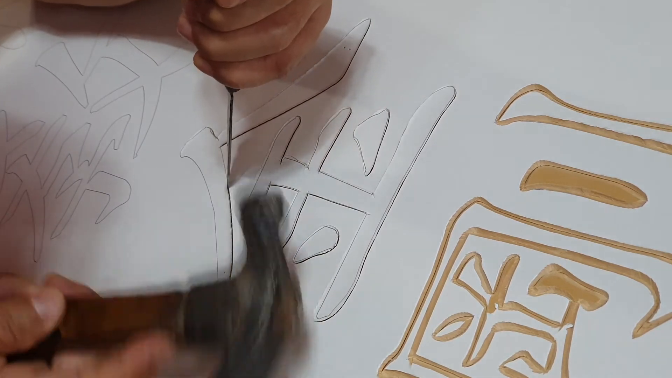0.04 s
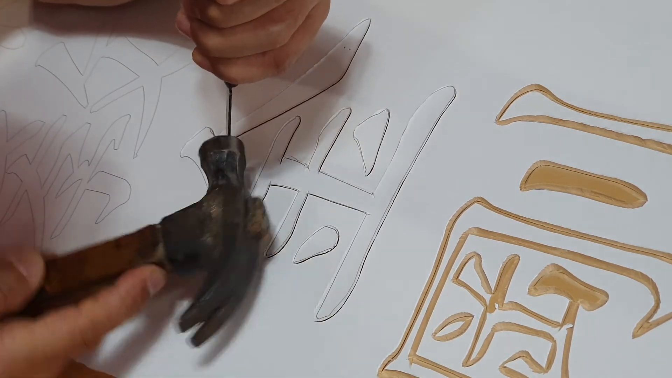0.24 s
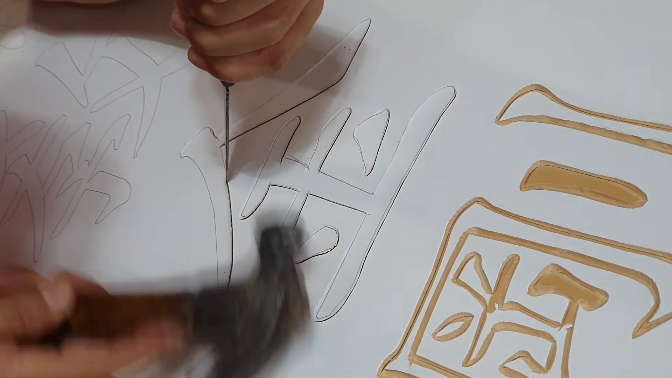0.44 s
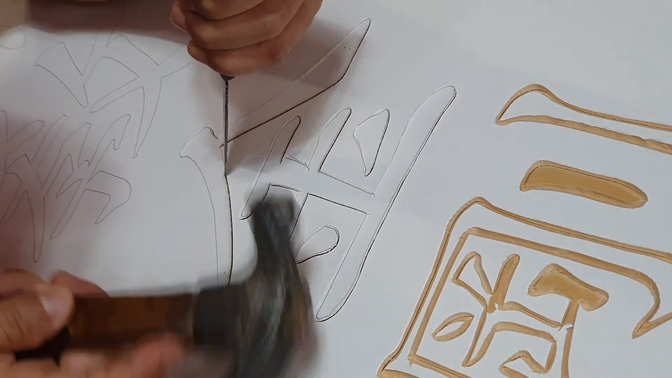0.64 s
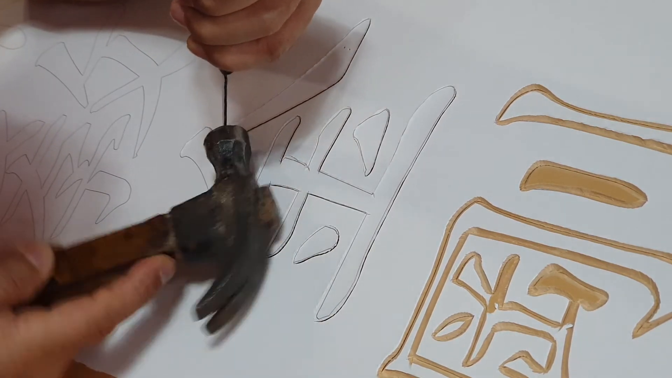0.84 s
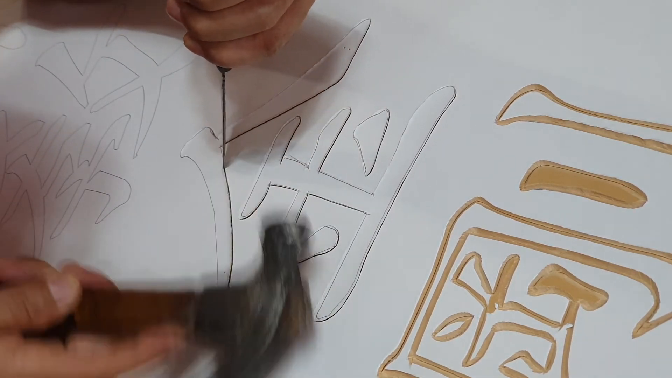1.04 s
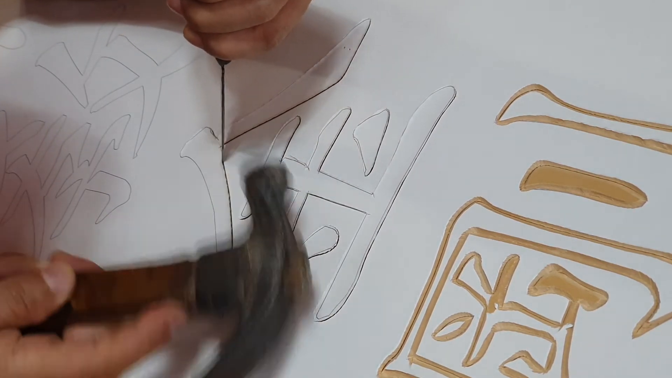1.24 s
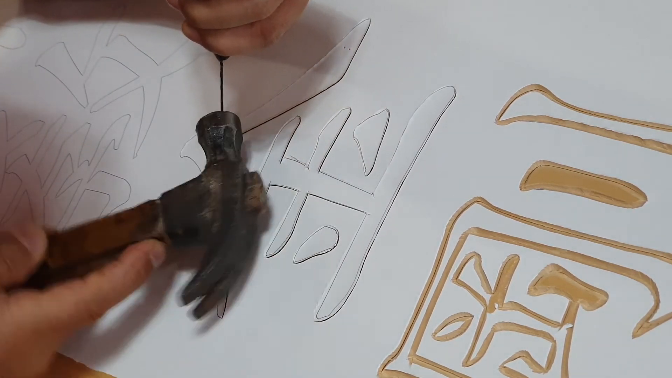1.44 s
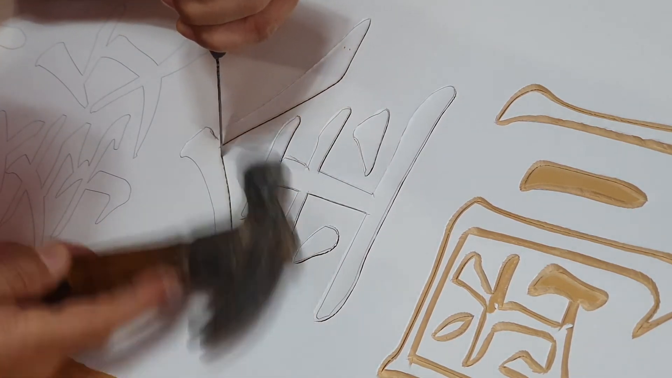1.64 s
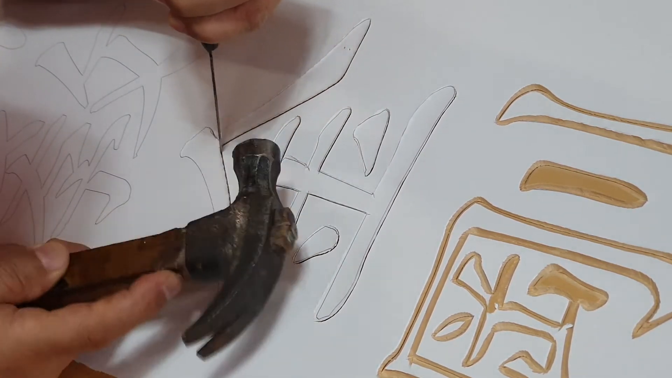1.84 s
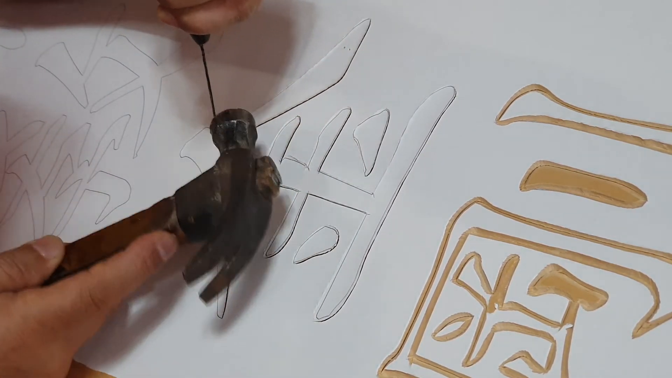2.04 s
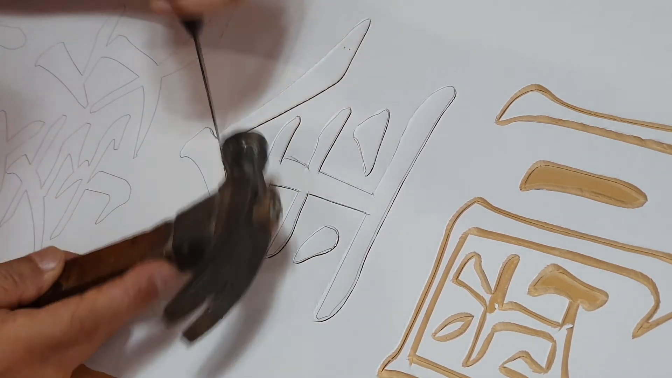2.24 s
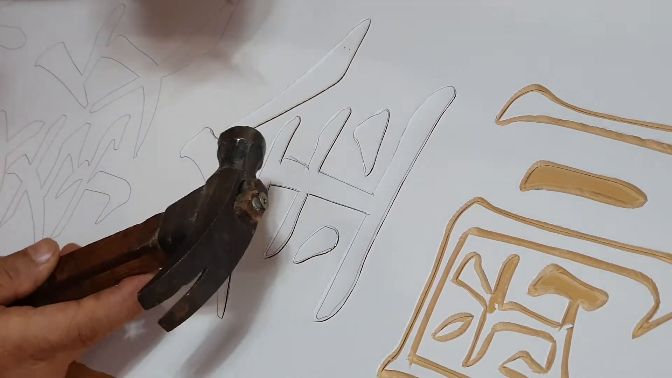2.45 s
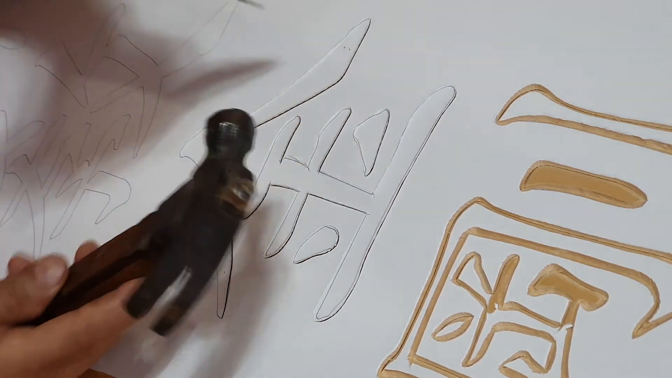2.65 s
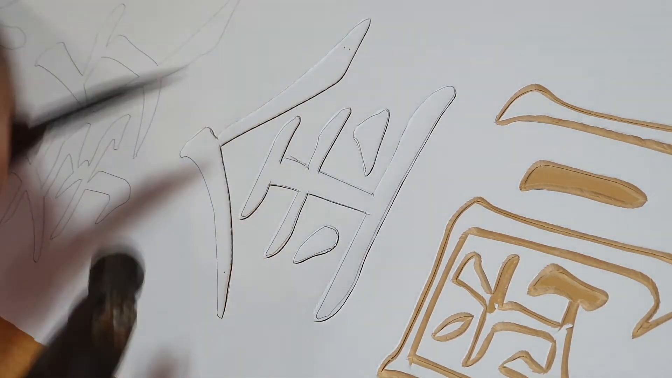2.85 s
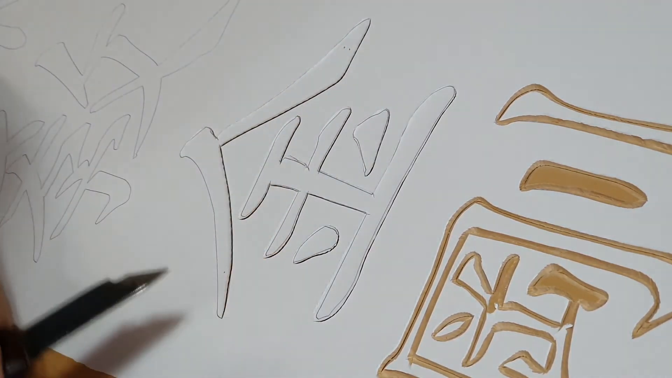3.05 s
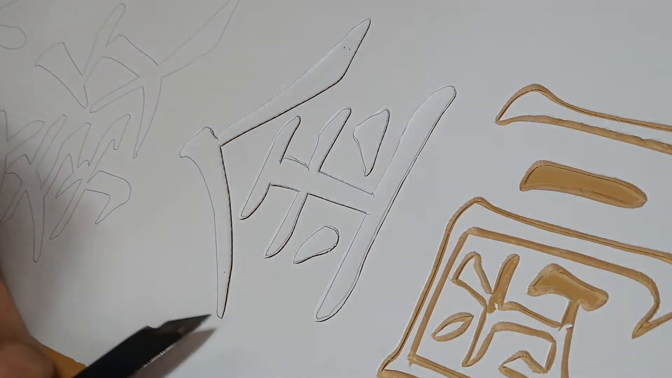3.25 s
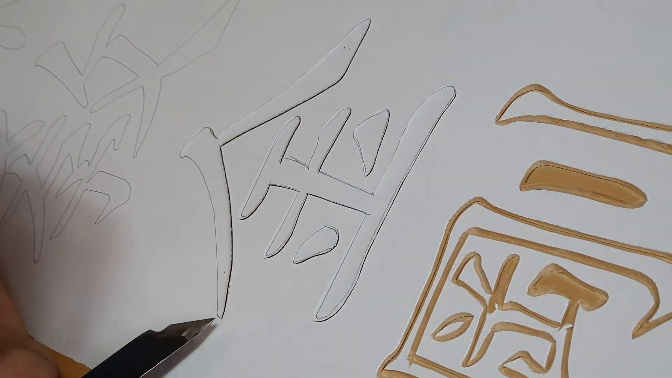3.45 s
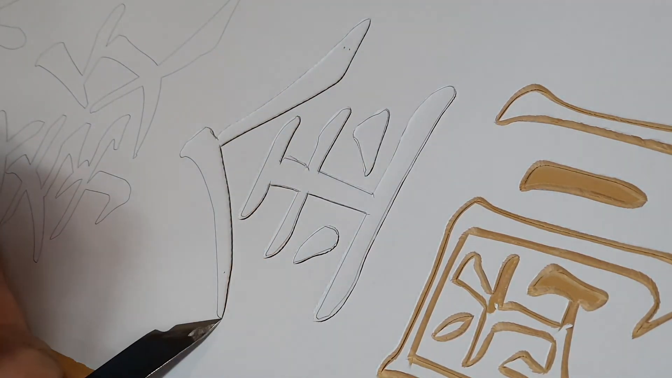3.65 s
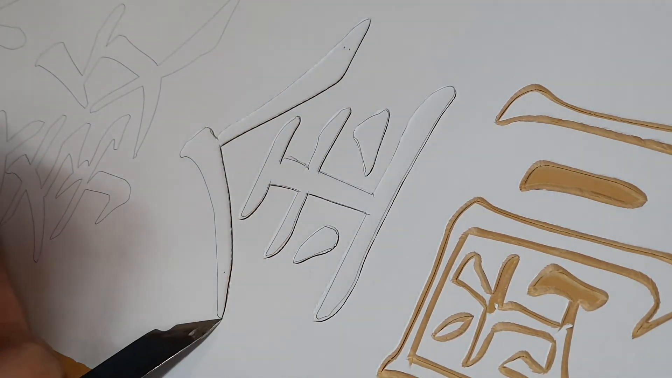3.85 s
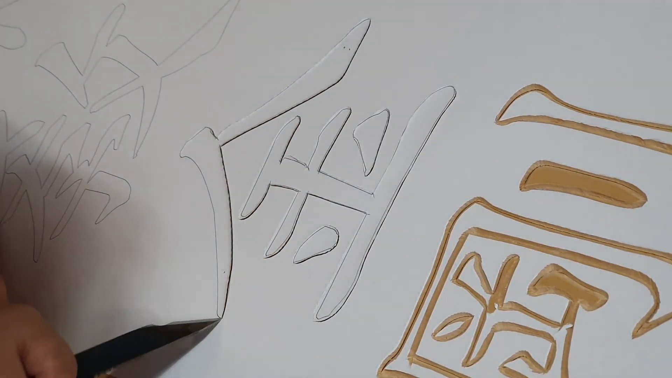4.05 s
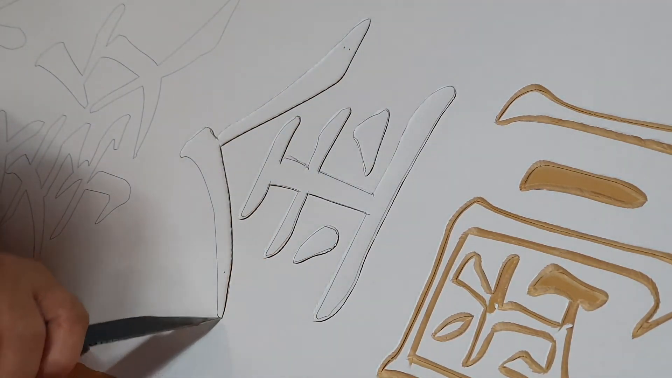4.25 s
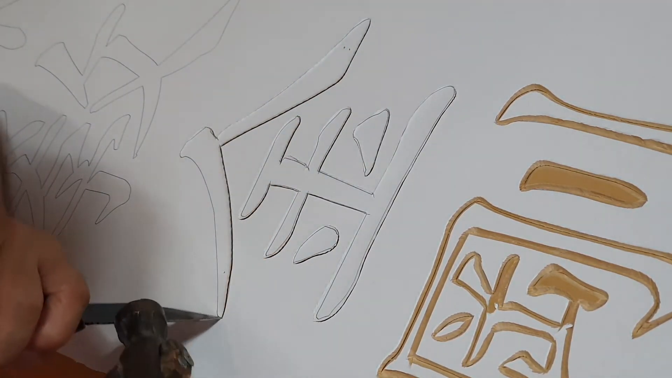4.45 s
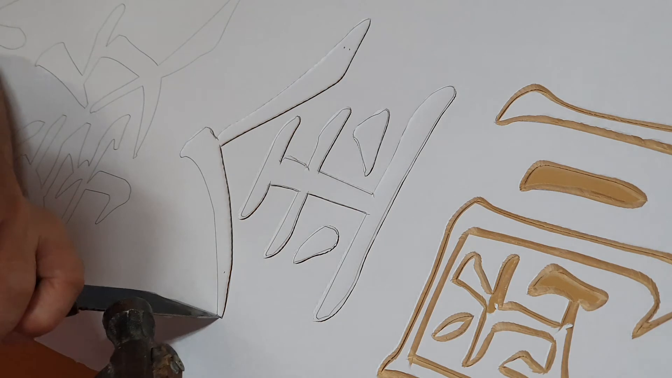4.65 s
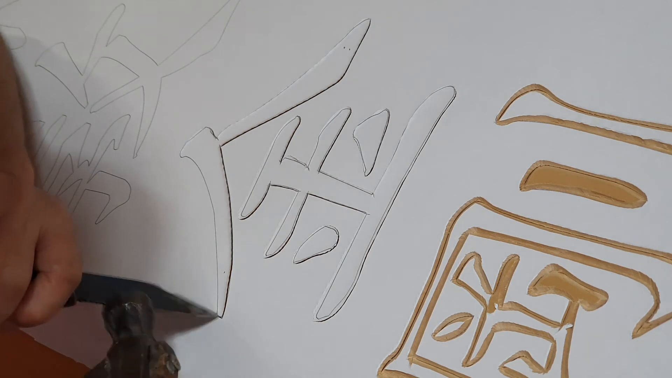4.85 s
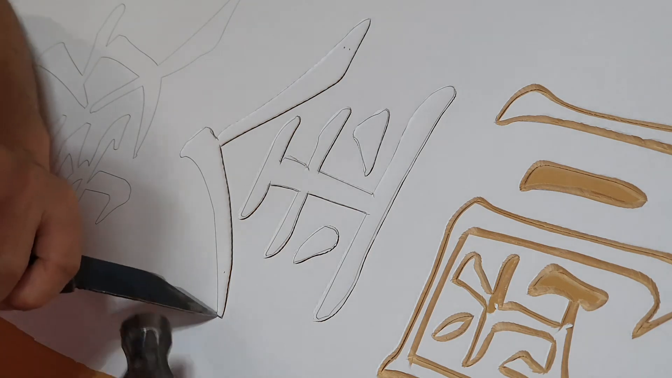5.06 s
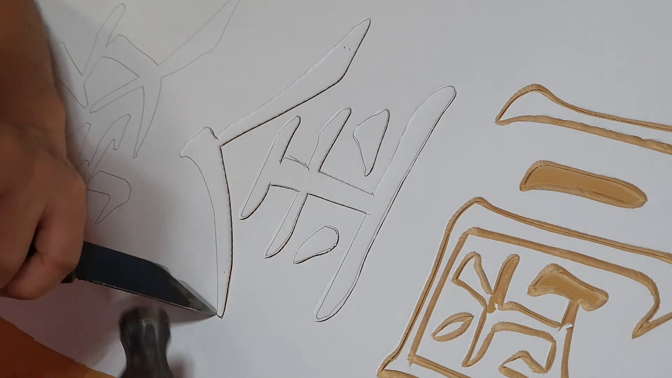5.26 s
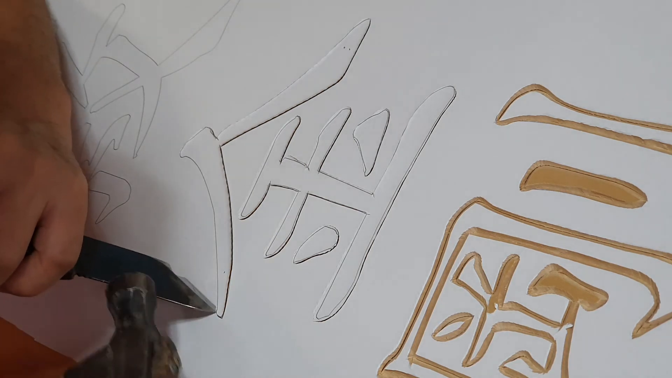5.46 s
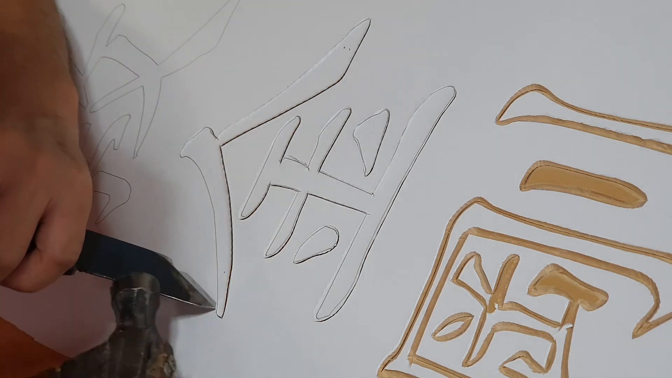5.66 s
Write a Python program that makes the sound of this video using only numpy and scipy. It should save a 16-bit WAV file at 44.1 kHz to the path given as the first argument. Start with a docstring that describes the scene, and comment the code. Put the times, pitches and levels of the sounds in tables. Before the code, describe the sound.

In a bare workshop, a small steel hammer taps the back of a carving knife, heard up close. Eight short, bright clinks, each with a dull thud from the board, come evenly and quicken at the end, while a low outside drone swells and fades. Tools knock faintly during a pause of about two seconds. Then six more taps follow over soft room noise.

```python
"""Hammer on a carving knife

A small steel hammer taps the back of a knife cutting into a coated board, in a bare workshop.
Each blow chatters for a few ms in the hand-damped blade; board and bench thud, the room rings on.
Tools are shifted between the two cuts. A low outside drone swells and fades over the room noise."""
import sys
import numpy as np
from scipy import signal
from scipy.io import wavfile

SR = 44100
rng = np.random.default_rng(int(sys.argv[2]) if len(sys.argv) > 2 else 0)


def log_audio(samples):
    """Write samples as a 16-bit WAV file to the path given in sys.argv[1]."""
    # one column per channel
    frames = np.atleast_2d(samples).T
    # limit to full scale, then quantise
    limited = np.clip(frames, -1, 1)
    pcm = np.round(limited * 32767).astype(np.int16)
    wavfile.write(sys.argv[1], SR, pcm)


N = 251811
LEAD = SR // 4   # pre-roll, so an earlier blow still rings

# room noise spectrum: f/Hz, relative density/dB
AIR_SPECTRUM = [(90, -8), (145, -9.5), (270, -13), (680, -16), (1240, -15.5), (3300, -27.5), (6800, -35.5),
                (7800, -51), (10000, -58.5), (13000, -44), (16000, -47)]
# room noise stereo image: f/Hz, L-R correlation (negative acts as 0)
AIR_CORRELATION = [(60, 1), (180, 0.9), (550, 0.63), (1650, -0.48), (4970, -0.11), (15000, -0.04)]
# treble hiss envelope: t/s, level/dB
HISS_LEVEL = [(0, -50.5), (1.0, -56.5), (2.1, -57), (2.55, -67.5), (2.75, -85), (4.4, -120.5), (4.7, -62.5),
              (5.71, -44)]
# rumble envelope: t/s, level/dB
RUMBLE_LEVEL = [(0, -41.5), (2.0, -43), (4.0, -44.5), (4.3, -47), (5.71, -48.5)]
# drone envelope: t/s, level/dB
DRONE_LEVEL = [(0.15, -73.5), (0.196, -57.5), (0.356, -40.5), (0.818, -39.5), (0.886, -32.5),
               (1.304, -23.5), (1.576, -24), (1.86, -30), (2.0, -69)]
# drone partials: frequency ratio, level/dB
DRONE_SPECTRUM = [(1.0, 0), (1.5, -22), (3.0, -30)]
# workshop reverb: f/Hz, T60/s, relative density/dB, L-R correlation
REVERB_BANDS = [(160, 0.48, 8, 0.99), (418, 0.51, 0.5, 1), (1028, 0.18, 17, 0.36), (2393, 0.33, -2.5, 0.3),
                (5890, 0.28, 0, 1), (9970, 0.23, 6, 0.075), (15940, 0.28, -4, 0.11)]
# tool handling: t/s, peak/dB, f/Hz, width/Hz, rustle T60/s
TOOL_KNOCKS = [(2.819, -45, 890, 2560, 0.044), (2.844, -51, 2510, 4000, .12),
               (3.158, -60.5, 7000, 4080, .012), (3.314, -44, 2820, 854, 0.0094)]
# modes of the board, damped by the bench: f/Hz, relative level/dB
BOARD_MODES = [(165, -0.5), (245, 2), (320, -9), (412, 1), (560, -1), (645, 0.5), (765, -1), (985, -1),
               (1195, 0.5), (1460, -3.5)]
# grip and spot per cut: start/s, low twist/Hz, high twist/Hz, low twist re low bend/dB,
# high twist re low bend/dB, crack re high bend/dB, high bend width/Hz, core share,
# bench peak at start/dB, bench growth/(dB/s)
KNIFE_CUTS = [(-0.1, 3990, 6850, -19.5, -3.5, -8.5, 7000, 0.1, -25, -1.5),
              (4.399, 4700, 7550, -8, -14, -8, 2290, 0, -48, 16)]
# blows: t/s, low bend/dB, low bend/Hz, middle bend/Hz, middle re low bend/dB, high re low bend/dB,
# direct re room feed/dB, board/dB, favoured board pitch/Hz
HAMMER_BLOWS = [(-0.1, -30, 2390, 5800, 4, 1.5, 2.5, -13, 387),
                (0.2027, -32, 2374, 5680, 3.5, 1.5, 8.5, -19.5, 364),
                (0.4969, -32.5, 2340, 5750, 5, 1.5, 7.5, -18.5, 377),
                (0.8017, -32, 2400, 5720, 1.5, 0.5, 9, -20.5, 352),
                (1.1088, -33, 2370, 5730, 5.5, 2.5, 8, -19.5, 400),
                (1.4092, -33, 2400, 5730, 4.5, 1.5, 9, -22.5, 372),
                (1.6878, -32.5, 2410, 5520, 0.5, -0.5, 9.5, -19.5, 434),
                (1.9227, -35, 2290, 5610, 3.5, 1, 11.5, -17, 271),
                (2.095, -35, 2290, 5740, 2, -3, 9.5, -14.5, 546),
                (4.4346, -32, 2510, 6440, -5, -24.5, 18.5, -24.5, 348),
                (4.6247, -28.5, 2650, 6210, -5.5, -7.5, 8.5, -25.5, 396),
                (4.8682, -28, 2430, 6360, -10, -9.5, 8, -21.5, 760),
                (5.1202, -30, 2510, 5920, 2.5, -5.5, 6.5, -18.5, 616),
                (5.3753, -29.5, 2600, 5970, 1, -8.5, 9, -17.5, 436),
                (5.6518, -33.5, 2240, 5660, 12.5, -2.5, 7, -18.5, 620)]

# damping by hand and cut: low bend, middle bend, low twist, high twist, crack
MODE_WIDTHS_HZ = (800, 850, 1400, 900, 5000)
HIGH_BEND_HZ, HIGH_BEND_SCATTER = 10990, 0.036
CRACK_HZ = 15300   # steel-on-steel contact
TIME_S = np.arange(N) / SR


def from_db(db):
    """Level to gain."""
    return 10 ** (np.asarray(db) / 20)


def unit_rms(x):
    """Scale to rms 1."""
    return x / np.sqrt(np.mean(x ** 2) + 1e-20)


def envelope_db(points):
    """Breakpoints to a level per sample."""
    return np.interp(TIME_S, *np.transpose(points))


def at_hz(table, hz, column=1):
    """Table lookup on a log-frequency axis."""
    table = np.array(table)
    return np.interp(np.log(hz), np.log(table[:, 0]), table[:, column])


def drift(corner_hz):
    """Slow random curve, rms about 1."""
    step = 40
    r = np.exp(-2 * np.pi * corner_hz * step / SR)
    slow = signal.lfilter([1], [1, -2 * r, r * r], rng.standard_normal(N // step + 2002))[2000:]
    return np.interp(np.arange(N) / step, np.arange(len(slow)), unit_rms(slow))


def resonate(x, hz, width_hz):
    """Resonator, unity peak gain."""
    r, w = np.exp(-np.pi * width_hz / SR), 2 * np.pi * hz / SR
    return signal.lfilter([(1 - r * r) / 2, 0, (r * r - 1) / 2], [1, -2 * r * np.cos(w), r * r], x)


def ring(clicks, hz, t60_s):
    """Decaying unit sine per unit click."""
    r, w = from_db(-60 / (t60_s * SR)), 2 * np.pi * hz / SR
    return signal.lfilter([0, np.sin(w)], [1, -2 * r * np.cos(w), r * r], clicks + 1e-18)


def bandpass(x, low_hz, high_hz):
    """Butterworth band filter."""
    return signal.sosfilt(signal.butter(2, [low_hz, high_hz], "band", fs=SR, output="sos"), x)


def noise_bands(length, low_hz):
    """Half-octave noise as (centre/Hz, mid, side); neighbours uncorrelated."""
    edges_hz = low_hz * 2 ** np.arange(0, np.log2(19000 / low_hz), .5)
    white = rng.standard_normal((2, 2, length))
    for k, (low, high) in enumerate(zip(edges_hz, edges_hz[1:])):
        yield np.sqrt(low * high), *bandpass(white[k % 2], low, high)


def stereo(mid, side, correlation):
    """Mid and side to left and right."""
    correlation = np.clip(correlation, 0, 1)
    return np.sqrt(1 + correlation) * mid + np.sqrt(1 - correlation) * side * [[1], [-1]]


def delay_right(x, lag_s):
    """Stereo track that arrives on the left first."""
    left, right = np.broadcast_to(x, (2, LEAD + N))
    n = np.arange(LEAD + N)
    return np.array([left, np.interp(n - lag_s * SR, n, right)])


def add(track, sound, start_s):
    """Mix into a track with pre-roll."""
    at = LEAD + round(start_s * SR)
    track[..., at:at + sound.shape[-1]] += sound[..., :track.shape[-1] - at]


def room_noise(level_db=-55, flutter_db=1.0):
    """Air and far machinery; each band wavers slightly."""
    out = 0
    for hz, mid, side in noise_bands(N, low_hz=81.8):
        gain = from_db(at_hz(AIR_SPECTRUM, hz) + flutter_db * drift(corner_hz=12))
        out += gain * stereo(mid, side, at_hz(AIR_CORRELATION, hz))
    return from_db(level_db) * unit_rms(out)


def hiss():
    """Faint wide treble hiss; drops out between the cuts."""
    noise = bandpass(rng.standard_normal((2, N)), low_hz=3600, high_hz=8500)
    return from_db(envelope_db(HISS_LEVEL)) * unit_rms(noise)


def rumble():
    """Near-mono bass noise, slowly fading."""
    mid, side = bandpass(rng.standard_normal((2, N)), low_hz=36, high_hz=75)
    return from_db(envelope_db(RUMBLE_LEVEL)) * unit_rms(stereo(mid, side, correlation=0.96))


def drone(start_hz=52, sag_hz_per_s=.9, left_lead_rad=0.27, flutter_db=1.0):
    """Low tone from outside; swells and fades as its pitch sags."""
    phase = 2 * np.pi * np.cumsum(start_hz - sag_hz_per_s * TIME_S) / SR
    lead = np.array([[left_lead_rad], [0]])
    tone = sum(from_db(db) * np.sin(ratio * phase + lead) for ratio, db in DRONE_SPECTRUM)
    gain = from_db(envelope_db(DRONE_LEVEL) + flutter_db * drift(corner_hz=13))
    gate = (TIME_S > DRONE_LEVEL[0][0]) & (TIME_S < DRONE_LEVEL[-1][0])
    return np.sqrt(2) * gain * tone * gate


def workshop_reverb(x, gain_db=-27.5, gap_s=.003, build_s=.005, far_db=-23, far_t60_s=.38):
    """Echoes thicken after a gap, then decay per band; the rest of the building answers weakly."""
    t, response = np.arange(SR) / SR, 0
    far = from_db(far_db - 60 * t / far_t60_s)
    for hz, mid, side in noise_bands(len(t), low_hz=85.8):
        near = from_db(-60 * t / at_hz(REVERB_BANDS, hz))
        decay = from_db(at_hz(REVERB_BANDS, hz, column=2)) * (near + far)
        response += decay * stereo(mid, side, at_hz(REVERB_BANDS, hz, column=3))
    response *= np.clip((t - gap_s) / build_s, 0, 1)
    return from_db(gain_db) * signal.fftconvolve(x[None], response, axes=1)[:, :x.size]


def tool_knocks(tick_to_rustle=5.2):
    """Tools touch the board softly: a tick, then a short rustle."""
    out, t = np.zeros(LEAD + N), np.arange(SR // 5) / SR
    for start_s, peak_db, hz, width_hz, t60_s in TOOL_KNOCKS:
        touch = rng.standard_normal(len(t)) * from_db(-60 * t / t60_s)
        touch[0] = tick_to_rustle
        knock = resonate(resonate(touch, hz, width_hz), hz, width_hz)
        add(out, from_db(peak_db) * knock / np.abs(knock).max(), start_s)
    return out


def cut_at(time_s):
    """Row of the cut under way."""
    return [cut for cut in KNIFE_CUTS if cut[0] <= time_s][-1]


def bench(hz=120, t60_s=.2, rise_width_hz=45):
    """The heavy bench answers slowly on one low note; its level ramps over each cut."""
    note = resonate(ring(signal.unit_impulse(SR // 2), hz, t60_s), hz, rise_width_hz)
    note /= np.abs(note).max()
    out = np.zeros(LEAD + N)
    for blow_s, *_ in HAMMER_BLOWS:
        cut_s, *_, start_db, growth_db_per_s = cut_at(blow_s)
        add(out, from_db(start_db + growth_db_per_s * (blow_s - cut_s)) * note, blow_s)
    return out


def board(t60_at_400hz_s=.055, detune=.06, scatter_db=2, falloff_db_per_oct=17, max_falloff_db=9):
    """Modal thud. The spot under the knife favours one pitch; the pressing hand detunes each blow."""
    out, impact = np.zeros(LEAD + N), signal.unit_impulse(SR // 4)
    for blow_s, *_, board_db, favoured_hz in HAMMER_BLOWS:
        for k, (nominal_hz, mode_db) in enumerate(BOARD_MODES):
            hz = nominal_hz * (1 + detune * rng.standard_normal())
            falloff_db = min(falloff_db_per_oct * abs(np.log2(hz / favoured_hz)), max_falloff_db)
            gain = from_db(board_db + mode_db - falloff_db + scatter_db * rng.standard_normal())
            mode = ring(impact, hz, t60_at_400hz_s * np.sqrt(400 / hz))
            mode = resonate(mode, hz, width_hz=hz / 4)   # low modes build up slowly
            add(out, (-1) ** k * gain * mode, blow_s)
    return out


def chatter(contact_s=.0032, rattle_db=13, correlation=0.51):
    """Impact, then rattle and glances off board and hands; stereo, unit energy."""
    mid, side = rng.standard_normal((2, 400))[:, :round(contact_s * SR)]
    force = from_db(rattle_db) * stereo(mid, side, correlation)
    force[:, 0] = 1
    return force / np.sqrt(np.mean(np.sum(force ** 2, axis=1)))


def blade_mode(hz, width_hz, core_share, core_narrowing=7):
    """Struck, damped mode; a share of narrower core rings a little longer."""
    impact = signal.unit_impulse(1000)
    broad = resonate(resonate(impact, hz, width_hz), hz, width_hz)
    core = resonate(broad, hz, width_hz / core_narrowing)
    return unit_rms(unit_rms(broad) + core_share * unit_rms(core))


def blade():
    """Each blow excites three bends, two twists and the contact crack. Returns room feed, direct."""
    room_feed, direct = np.zeros(LEAD + N), np.zeros((2, LEAD + N))
    polarity = [1, 1, -1, -1, -1, 1]
    for blow_s, low_db, low_hz, middle_hz, middle_db, high_db, direct_db, *_ in HAMMER_BLOWS:
        cut = cut_at(blow_s)
        twists_hz, twists_db = cut[1:3], cut[3:5]
        crack_db, high_width_hz, core_share = cut[5:8]
        high_hz = HIGH_BEND_HZ * (1 + HIGH_BEND_SCATTER * rng.standard_normal())
        modes_hz = [low_hz, middle_hz, *twists_hz, CRACK_HZ, high_hz]
        widths_hz = [*MODE_WIDTHS_HZ, high_width_hz]
        levels_db = low_db + np.array([0, middle_db, *twists_db, high_db + crack_db, high_db])
        modes = [blade_mode(hz, width, core_share) for hz, width in zip(modes_hz, widths_hz)]
        clink = (from_db(levels_db) * polarity) @ modes
        add(room_feed, clink, blow_s)
        add(direct, from_db(direct_db) * signal.convolve(clink[None], chatter()), blow_s)
    return room_feed, direct


def scene(board_send_db=-19):
    """Knife work and echoes over the background; the flat-lying board sends less into the room."""
    steel_feed, steel = blade()
    wood, tools = board(), tool_knocks()
    echoes = workshop_reverb(steel_feed + tools + from_db(board_send_db) * wood)
    direct = delay_right(steel, lag_s=.0001) + delay_right(wood + bench(), lag_s=.0002) + tools
    return (direct + echoes)[:, LEAD:] + room_noise() + hiss() + drone() + rumble()


def record(dry, limit_db=-5, attack_s=.0025, release_db_per_s=250, cutoff_hz=16984):
    """Limiter, soft clip, low-pass. The attack lags, so a blow's first cycles overload."""
    over_db = np.maximum(20 * np.log10(np.abs(dry).max(axis=0) + 1e-9) - limit_db, 0)
    release_db = release_db_per_s * TIME_S
    held_db = np.maximum.accumulate(over_db + release_db) - release_db
    r = np.exp(-1 / (attack_s * SR))
    reduction_db = signal.lfilter([1 - r], [1, -r], held_db)
    limited = np.tanh(dry * from_db(-reduction_db))
    return signal.sosfilt(signal.cheby2(14, 70, cutoff_hz, fs=SR, output="sos"), limited)


dry = scene()
out = record(dry)
log_audio(out)
```